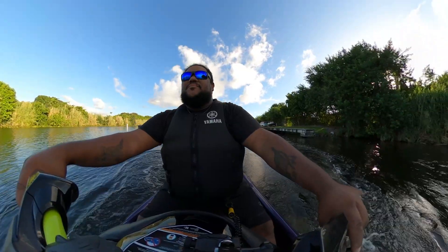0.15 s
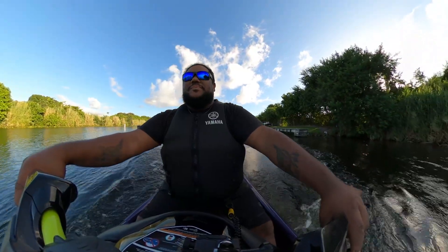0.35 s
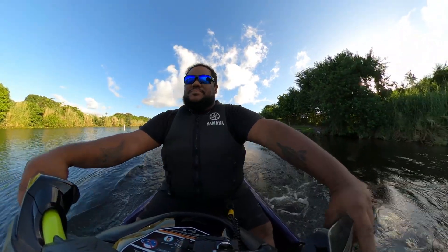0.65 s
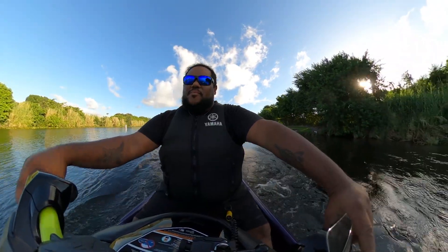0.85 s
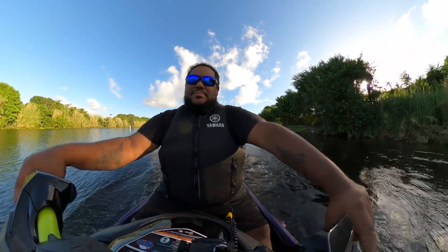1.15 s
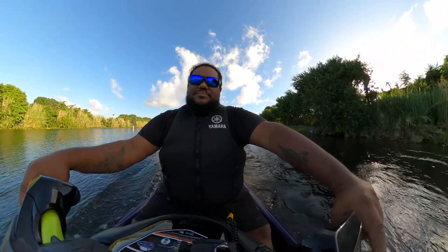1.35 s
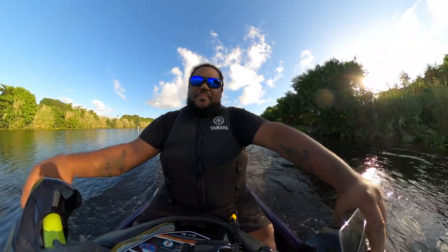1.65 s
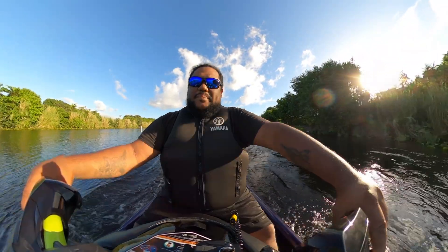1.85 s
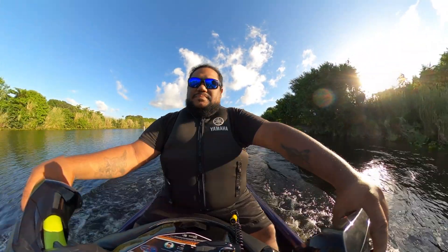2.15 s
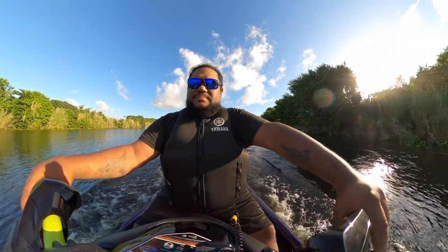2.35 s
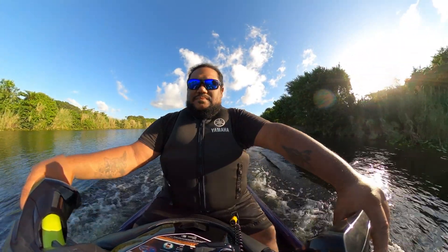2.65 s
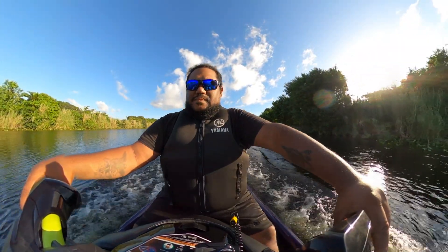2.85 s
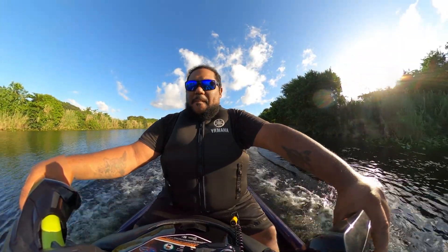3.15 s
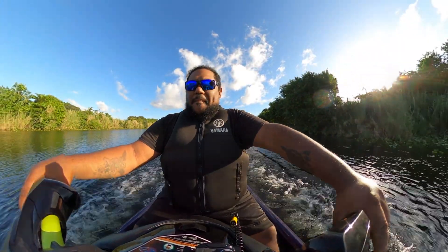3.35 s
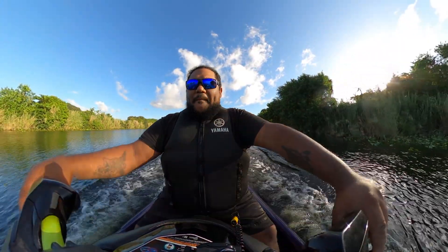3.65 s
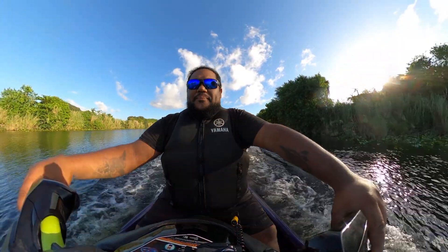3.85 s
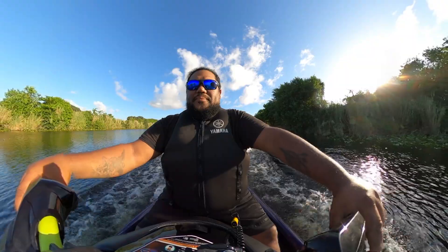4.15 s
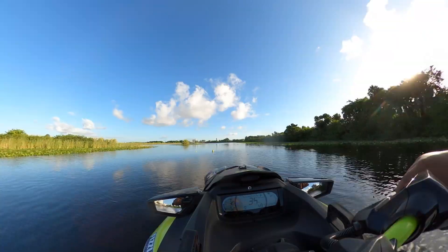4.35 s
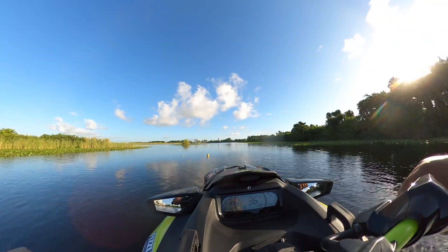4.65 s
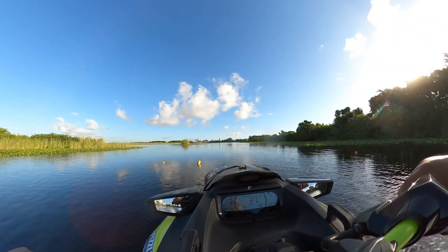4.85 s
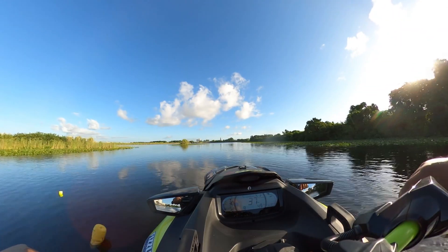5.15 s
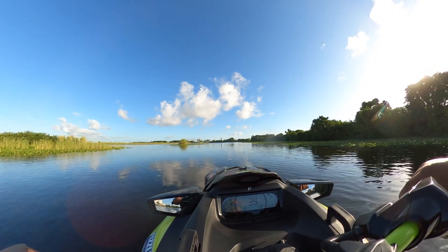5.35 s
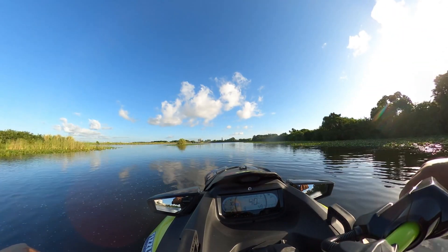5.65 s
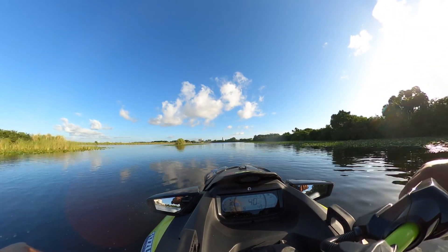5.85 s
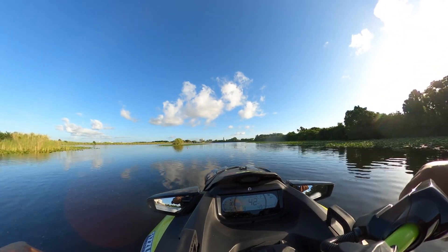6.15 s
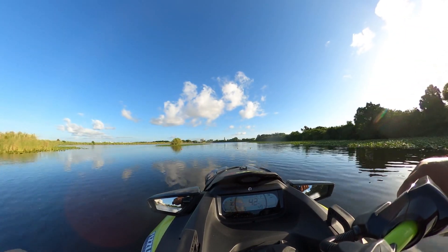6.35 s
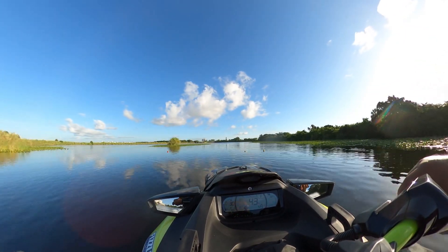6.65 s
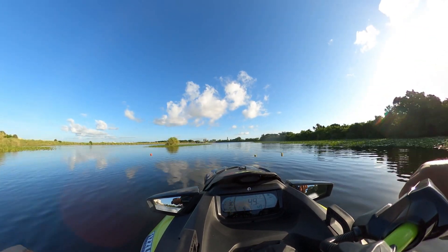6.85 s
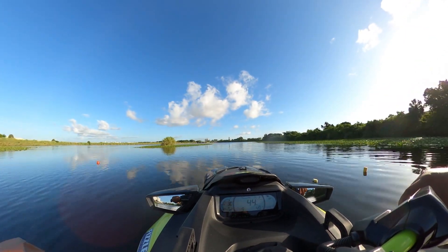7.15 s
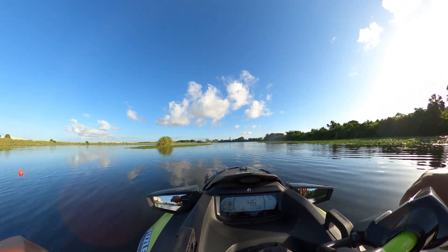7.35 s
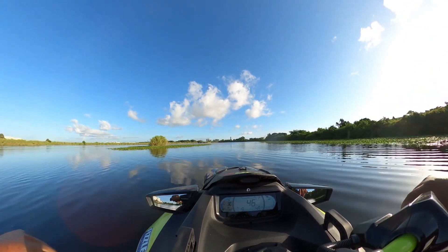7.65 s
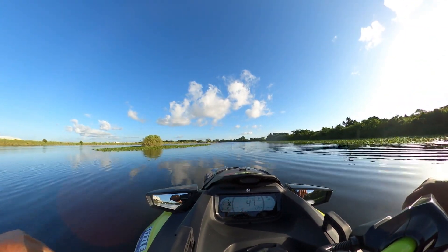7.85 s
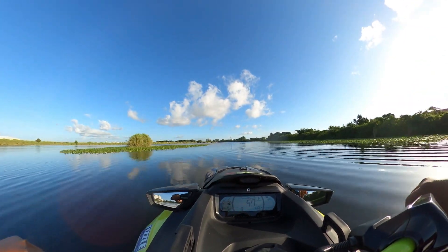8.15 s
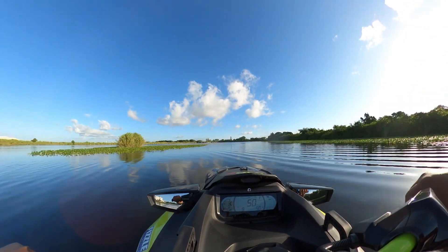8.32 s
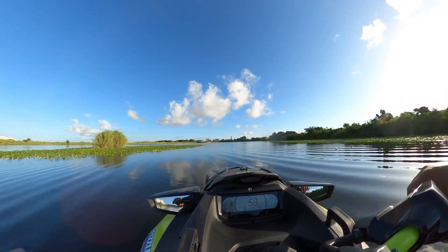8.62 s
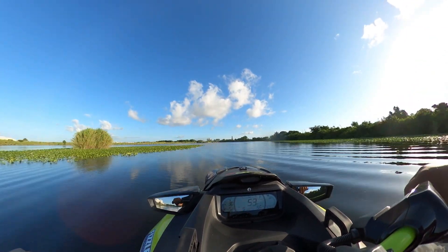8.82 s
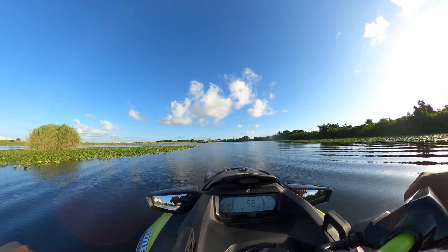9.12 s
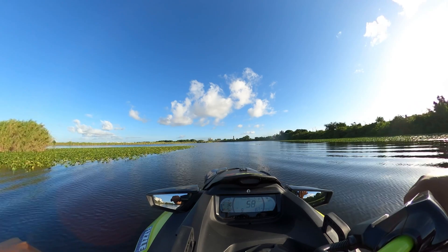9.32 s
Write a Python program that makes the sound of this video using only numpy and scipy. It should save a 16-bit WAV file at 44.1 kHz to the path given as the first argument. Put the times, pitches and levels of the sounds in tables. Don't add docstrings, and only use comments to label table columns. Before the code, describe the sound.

A jet ski engine heard on board through a muffled action camera. For about four seconds it cruises low and throbbing, with a thin gear whine and gurgling wake, revving slightly near the end. A small click marks an abrupt switch to a faster, buzzier drone with gusty wind. Around seven seconds it begins climbing, reaching a strong steady full-throttle roar by eight and a half, with rushing water and spray.

```python
import sys
import numpy as np
from scipy import signal
from scipy.fft import rfft, irfft
from scipy.io import wavfile
from scipy.ndimage import uniform_filter1d

SR = 44100
rng = np.random.default_rng(int(sys.argv[2]) if len(sys.argv) > 2 else 0)


def persist_wave(psi):
    counts = np.round(np.clip(psi, -1, 1) * 32767).astype(np.int16)
    wavfile.write(sys.argv[1], SR, np.atleast_2d(counts).T)


def gain_from_db(level_db):
    decades = np.asarray(level_db, float) / 20
    return 10 ** decades


N = 418068
t = np.arange(N) / SR
CUT_S = 4.35466
MESH_TEETH = 104.2


def wander(rate_hz):
    size = N // 64 + 1
    spec = rfft(rng.standard_normal(size))
    spec = spec / (1 + (np.arange(size // 2 + 1) * SR / N / rate_hz) ** 4)
    v = np.interp(t, np.linspace(0, N / SR, size), irfft(spec, size))
    return (v - v.mean()) / v.std()


def columns(table):
    s, *cols = np.transpose(table)
    return [np.interp(t, s, c) for c in cols]


def tone(phase, db, sway_db, slip_rad, rate_hz):
    level = np.sqrt(2) * gain_from_db(db + sway_db * wander(rate_hz))
    return level * np.cos(phase + slip_rad * wander(rate_hz))


# offset/orders, level/dB
MESH_SIDES = [(-6, -24), (-3, -15), (-2, -14), (-1, -13), (1, -7), (2, -6), (3, -12), (5, -14), (6, -21),
              (9, -26)]


def gears(cycle, teeth, db, side_db, drift_rad, harmonic):
    mesh = harmonic * (teeth * cycle + drift_rad * wander(45))
    full = np.clip((t - 8) / .3, 0, 1)
    out = tone(mesh, db - 3.0, 3.0, .2 + .6 * full, rate_hz=55)
    for k, d in MESH_SIDES:
        firing_boost_db = full * (-3 if k % 3 else 8 + .8 * max(k, 0))
        line_db = db - 3.0 + d + side_db + firing_boost_db
        slip_rad = .9 + .6 * harmonic + .4 * full
        out += tone(mesh + harmonic * k * cycle, line_db, 3.5, slip_rad, rate_hz=22)
    return out


def mirror(x, db):
    fold_hz = 24000
    image = 2 * x * np.cos(2 * np.pi * fold_hz * t)
    band = signal.butter(8, [11500, 12800], "bandpass", fs=SR, output="sos")
    return gain_from_db(db) * signal.sosfilt(band, image)


def exhaust(cycle, firing_hz, full, drone_db, orders, rates_hz, upper, patchy_db, lag_rad, weak,
            sway_db, slip_rad):
    surge_hz, surge_width_hz, surge_db = 178, 10, 3.5
    hunting_db = surge_db * np.exp(-((firing_hz - surge_hz) / surge_width_hz) ** 2)
    out = tone(3 * cycle, drone_db, sway_db + hunting_db, slip_rad, rate_hz=10.9)

    planes_s, deep_db = 1.38, -11
    for n, (k, db) in enumerate(zip(orders, upper)):
        db = np.interp(firing_hz, rates_hz, db) + patchy_db * (1 - .75 * full) * wander(2.2)
        db += (k == 6) * deep_db * np.clip((planes_s - t) / .15, 0, 1)
        out += tone(k * cycle + lag_rad * (n + 1), db, sway_db, slip_rad, rate_hz=19.0)

    panel_hz, panel_width_hz, panel_db = 1200, 45, 12
    for k, part_db, full_db in weak:
        lift_db = panel_db * np.exp(-((k * firing_hz / 3 - panel_hz) / panel_width_hz) ** 2)
        db = part_db + full * (full_db - part_db) + lift_db
        out += tone(k * cycle + 7 * rng.random(), db, 1.9, .5, rate_hz=2.4)
    return out


def engine(table, orders, rates_hz, upper, patchy_db, octave_db, lag_rad, weak, sway_db, slip_rad,
           hunt, teeth, side_db, drift_rad, mirror_db):
    firing_hz, drone_db, gear_db = columns(table)
    firing_hz = uniform_filter1d(firing_hz, size=SR // 12, mode="nearest")
    cycle = 2 * np.pi * np.cumsum(firing_hz / 3 * (1 + hunt * wander(3))) / SR
    full = np.clip((firing_hz - 185) / 25, 0, 1)
    out = exhaust(cycle, firing_hz, full, drone_db, orders, rates_hz, upper, patchy_db, lag_rad, weak,
                  sway_db, slip_rad)

    throb_order, throb_depth = .48, .34
    depth = throb_depth * (firing_hz > 100) * (1 - full)
    throb = 1 + depth * np.cos(throb_order * cycle + 1.2 * wander(4))
    out += throb * gears(cycle, teeth, gear_db, side_db, drift_rad, harmonic=1)

    octave_top_hz, octave_roll_hz = 12250, 12
    roll_db = np.clip((2 * teeth * firing_hz / 3 - octave_top_hz) / octave_roll_hz, 0, 45)
    octave = gears(cycle, teeth - .5, octave_db - roll_db, side_db + 7, 1.5 * drift_rad, harmonic=2)
    return out + octave + mirror(octave, mirror_db), cycle


# t/s, firing f/Hz, firing drone level/dB, gear mesh level/dB
CRUISE = [(0.0, 76.25, -23.5, -59), (0.42, 74.6, -26, -72), (0.62, 77.7, -22, -56.5),
          (1.62, 78.07, -20, -59), (1.78, 76.55, -25, -59), (1.92, 77.78, -21.5, -56),
          (3.25, 77.89, -23.5, -54), (3.45, 76.9, -22, -54), (3.68, 77.95, -20, -58.5),
          (3.92, 86.25, -20.5, -48), (4.13, 88.8, -27, -42.5), (4.36, 91.6, -23, -47)]
CRUISE_ORDERS, CRUISE_RATES_HZ = [6, 9, 12], [75.5, 77.5, 81.5, 84, 91]
CRUISE_UPPER = [
    [-26.5, -27.5, -33, -36, -30],
    [-30, -41, -38, -20, -25],
    [-46, -37.5, -45, -54, -54],
]
# order of engine cycle, level/dB at part throttle, level/dB at full
CRUISE_WEAK = [(1, -35, 0), (4, -32, 0), (7, -41, 0), (8, -40, 0), (11, -41, 0), (15, -49, 0), (16, -50, 0),
               (18, -49, 0), (19, -51, 0), (20, -48, 0), (27, -52, 0)]


def cruise():
    ride, cycle = engine(
        CRUISE, CRUISE_ORDERS, CRUISE_RATES_HZ, CRUISE_UPPER, patchy_db=2.0, octave_db=-58.5,
        lag_rad=0, weak=CRUISE_WEAK, sway_db=1.5, slip_rad=.18, hunt=.0016,
        teeth=MESH_TEETH + .6, side_db=-3, drift_rad=.4, mirror_db=-60)
    third_db = -77 - 12 * np.clip(t - 3.5, 0, 1)
    ride += gears(cycle, MESH_TEETH + .3, third_db, 3.0, .6, harmonic=3)
    return ride, cycle


# t/s, microphone wind level/dB, water flow level/dB
FLOW = [
    [(0.0, -34, -6), (1.0, -29, -3), (2.2, -30, 1.5), (2.5, -36, 3), (3.4, -28.5, 5), (3.75, -28, 4.5),
     (4.35, -23.5, 6.5)],
    [(4.5, -30, 0), (5.0, -18.5, 0.5), (5.4, -23, -0.5), (6.3, -23.5, 1.4), (6.65, -31, 2.1), (7.1, -21, 1),
     (7.55, -16.5, 2.5), (8.15, -21, 6), (8.55, -28.5, 4.5), (9.48, -25.5, 4.5)],
]
# level/dB at cruising flow, gain/(dB per dB of flow)
WATER = [
    [(-40.5, -0.54), (-41, -0.52), (-39.5, 0.33), (-55.5, 0.73)],
    [(-36.5, 0.1), (-38, 1.15), (-40.5, 0.99), (-55, 1.3)],
]


def flow():
    rides = []
    for table, water in zip(FLOW, WATER):
        wind_db, speed_db = columns(table)
        parts_db = [db + gain * speed_db for db, gain in water]
        rides.append(gain_from_db(np.array([wind_db] + parts_db)))
    slow, fast = rides
    return 20 * np.log10(np.hypot(slow * (t < CUT_S), fast * fade_in()))


# f/Hz, level/(dB per Hz)
WASH = [(20, 24), (50, 25), (110, 24), (190, 21), (340, 13.5), (600, 5.5), (1000, 2), (1380, -0.5),
        (1750, -7.5), (3200, -13), (4600, -20.5), (8400, -33), (9200, -40.5), (13000, -53)]
FLOW_HZ = [40, 250, 650, 1300, 5800, 8600]


def wash(cycle):
    buffet, hull, gurgle, rush, spray = flow()
    moves = [buffet + 29.24, hull + 39.47, gurgle + 40.14, rush + 38.95,
             spray + 57.6, .5 * (spray + 57.0)]
    f = np.maximum(np.arange(N // 2 + 1) * SR / N, 1)
    hz, db = np.transpose(WASH)
    shape_db = np.interp(np.log(f), np.log(hz), db, left=-20, right=-90)
    spec = rfft(rng.standard_normal(N)) * gain_from_db(shape_db)
    spec = spec * gain_from_db(-42.0) * np.sqrt(SR / 2 / 750)
    out, swell = np.zeros(N), wander(0.52)
    for octave in np.arange(4, 14.5, .5):
        share = np.clip(1 - 2 * np.abs(np.log2(f) - octave), 0, 1)
        place = np.interp(octave, np.log2(FLOW_HZ), range(6))
        move_db = sum(max(1 - abs(place - k), 0) * m for k, m in enumerate(moves))
        flicker_db = np.interp(octave, [6, 10], [1.6, .7]) * wander(8.0)
        gust_db = flicker_db + 0.66 * swell
        pulse = 1 + np.interp(octave, [8, 10], [0, .12]) * np.sin(3 * cycle)
        out += irfft(spec * share, N) * gain_from_db(move_db + gust_db) * pulse
    return out


def droplets():
    hiss_db = -80
    out = gain_from_db(hiss_db) * rng.standard_normal(N)
    for s, db in [(1.055, -64), (1.068, -69), (2.05, -70)]:  # t/s, level/dB
        out += gain_from_db(db) * np.exp(-np.abs(t - s) / .006) * rng.standard_normal(N)
    band = signal.butter(10, [8000, 13400], "bandpass", fs=SR, output="sos")
    return signal.sosfilt(band, out)


def fade_in():
    from_s, fade_s = 3.77, 0.83
    return np.clip((t - from_s) / fade_s, 0, 1)


# t/s, firing f/Hz, firing drone level/dB, gear mesh level/dB
SPRINT = [(4.45, 147.5, -18, -56.5), (5.1, 152.5, -16.5, -51), (6.1, 153.4, -18, -52),
          (6.77, 156, -14.5, -52), (6.98, 167.8, -15, -52.5), (7.33, 171.3, -19, -48.5),
          (7.6, 173.5, -24, -52.5), (7.94, 187.1, -21.5, -50), (8.17, 209.3, -11, -51.5),
          (8.36, 215, -10.5, -58), (9.48, 217, -9.5, -64.5)]
SPRINT_ORDERS, SPRINT_RATES_HZ = [4, 6, 8, 9], [153, 162, 173, 191, 205]
SPRINT_UPPER = [
    [-30, -45.5, -28, -45, -48.5],
    [-28.5, -42.5, -31.5, -48, -31.5],
    [-37.5, -39, -28, -27, -36],
    [-51.5, -41.5, -37.5, -42, -28.5],
]
# order of engine cycle, level/dB at part throttle, level/dB at full
SPRINT_WEAK = [(1, -29, -36), (2, -36, -28), (5, -50, -43), (12, -50, -51), (13, -47, -54), (15, -57, -46),
               (16, -49, -53), (21, -58, -62), (22, -60, -58), (23, -66, -70), (24, -65, -62),
               (31, -57, -64)]


def sprint():
    return engine(
        SPRINT, SPRINT_ORDERS, SPRINT_RATES_HZ, SPRINT_UPPER, patchy_db=2.0, octave_db=-84.0,
        lag_rad=1.6, weak=SPRINT_WEAK, sway_db=1.2, slip_rad=.15, hunt=.0008,
        teeth=MESH_TEETH + .25, side_db=0, drift_rad=.35, mirror_db=-5)


def scene():
    slow, slow_cycle = cruise()
    fast, fast_cycle = sprint()
    before = t < CUT_S
    crest = (.14 - slow[before][-1]) * np.exp(-np.abs(CUT_S - t) / .003)
    water = wash(np.where(before, slow_cycle, fast_cycle))
    return (before * (slow + crest) + fade_in() * fast + water + droplets())[None]


def band_limit(x):
    return signal.sosfilt(signal.butter(12, 16000, fs=SR, output="sos"), x)


def record(dry):
    opening = np.clip(.8 + t / .01, 0, 1)
    closing = np.clip((N / SR - t) / .003, 0, 1)
    mix = closing * opening * np.tanh(.6 * dry) / .6
    return band_limit(mix)


dry = scene()
out = record(dry)
persist_wave(out)
```